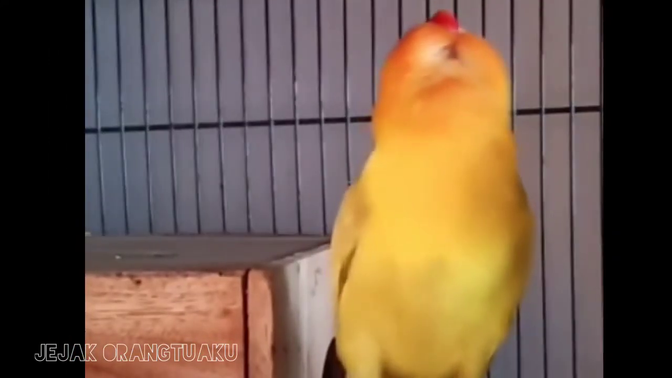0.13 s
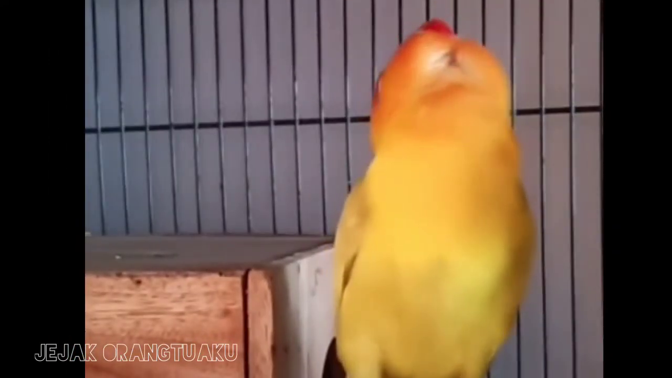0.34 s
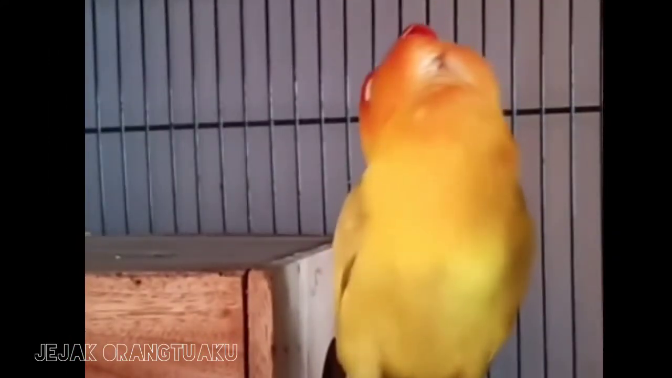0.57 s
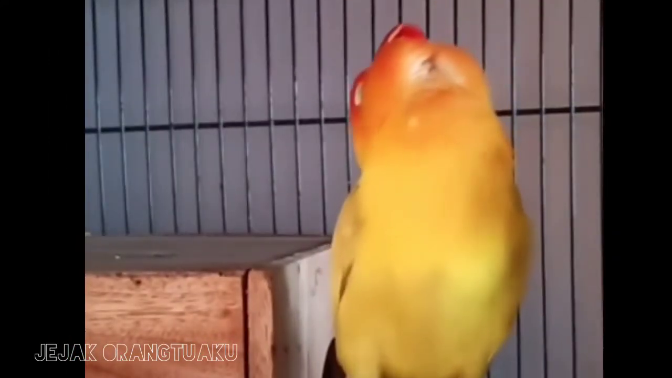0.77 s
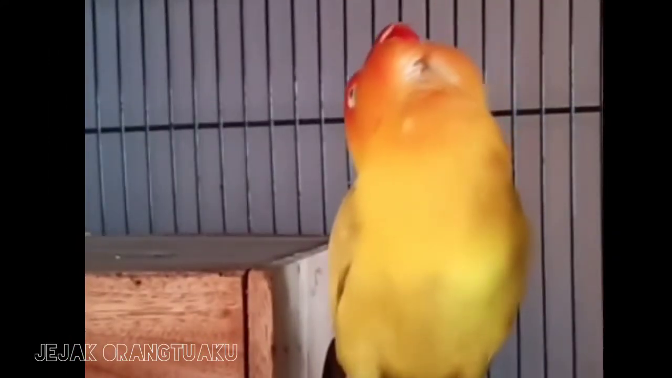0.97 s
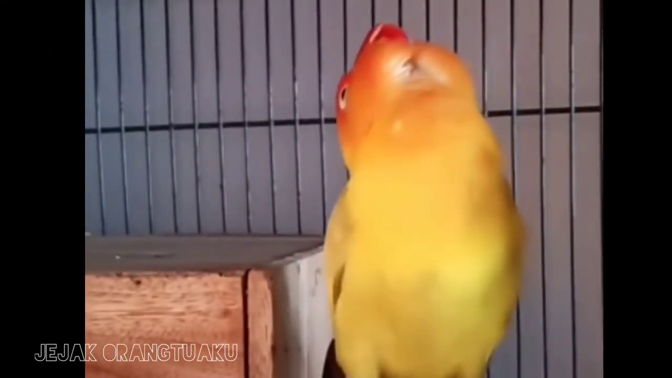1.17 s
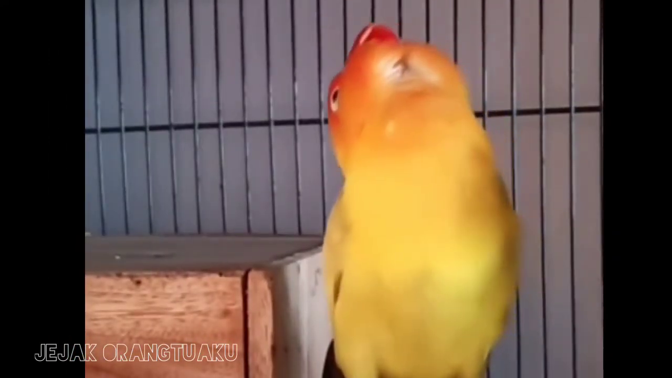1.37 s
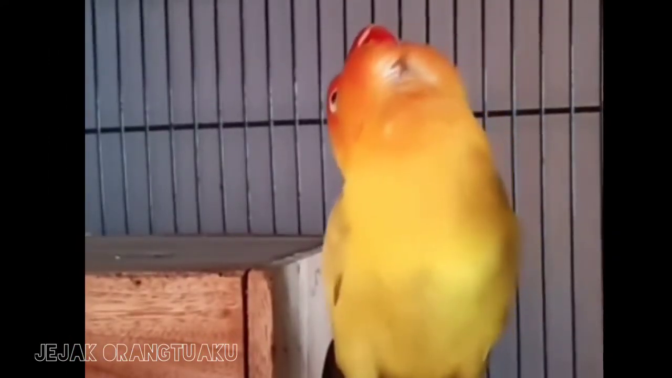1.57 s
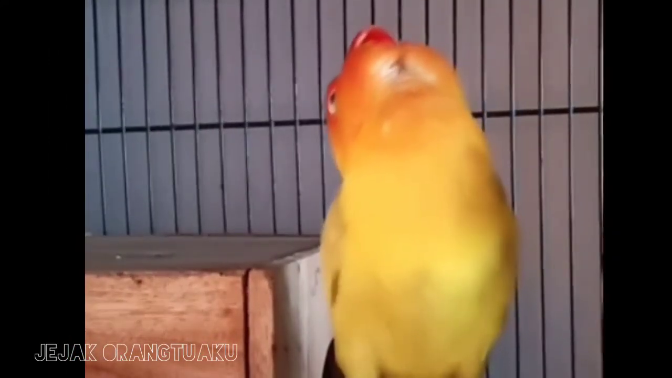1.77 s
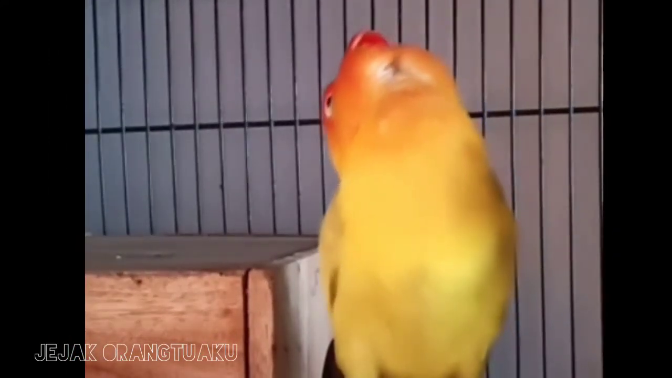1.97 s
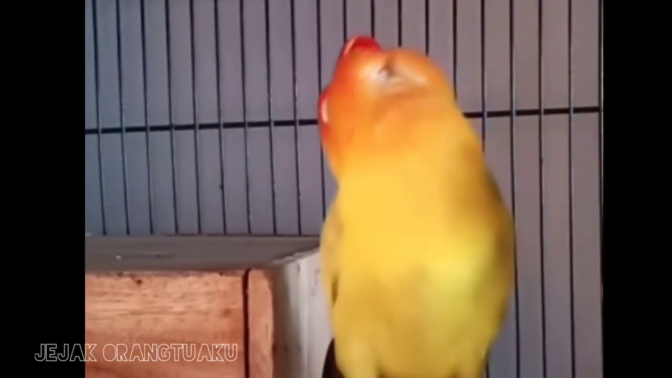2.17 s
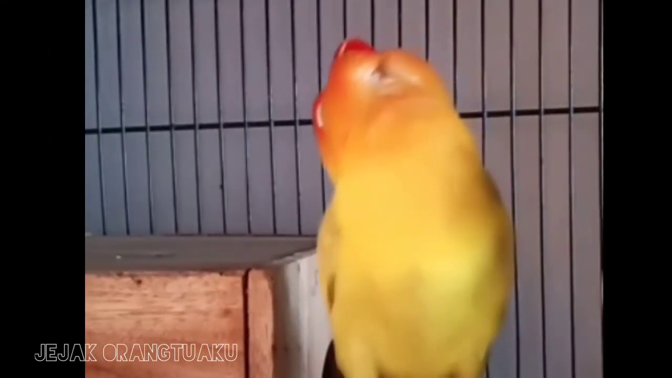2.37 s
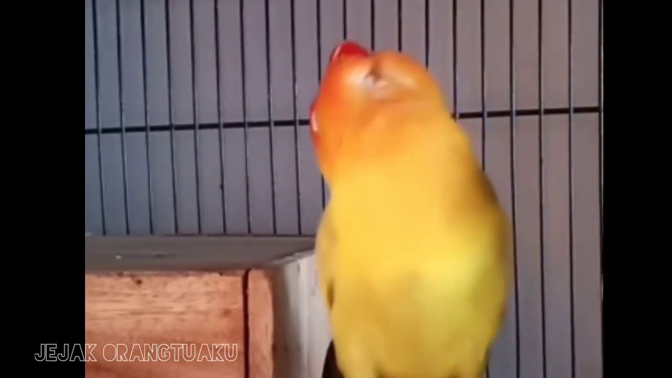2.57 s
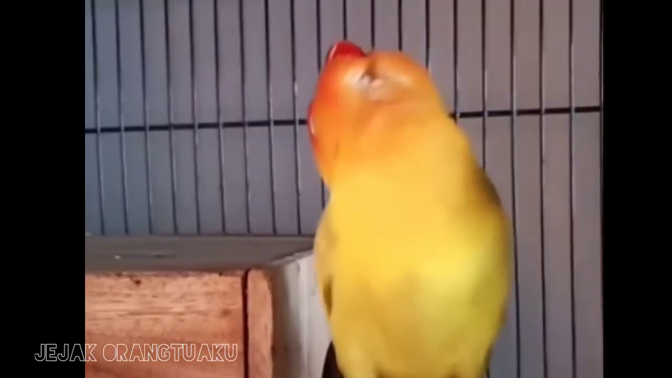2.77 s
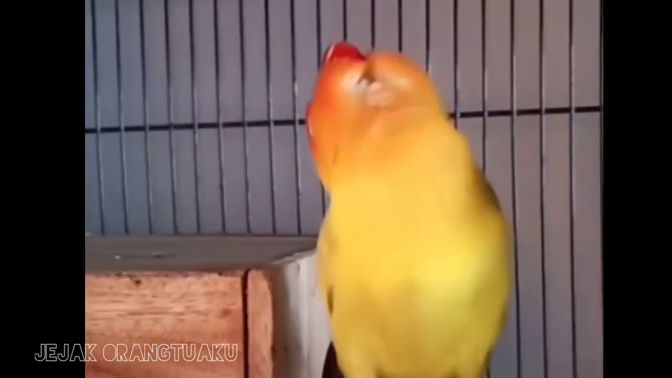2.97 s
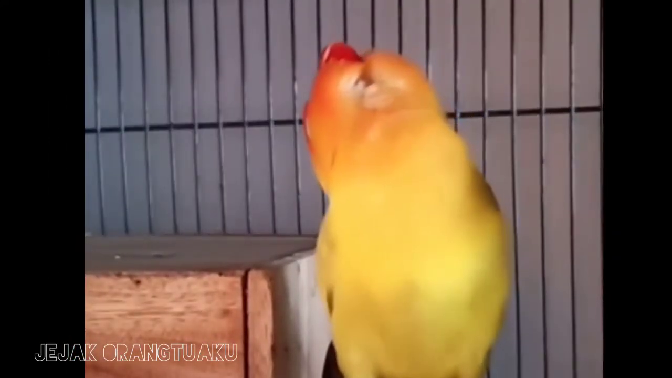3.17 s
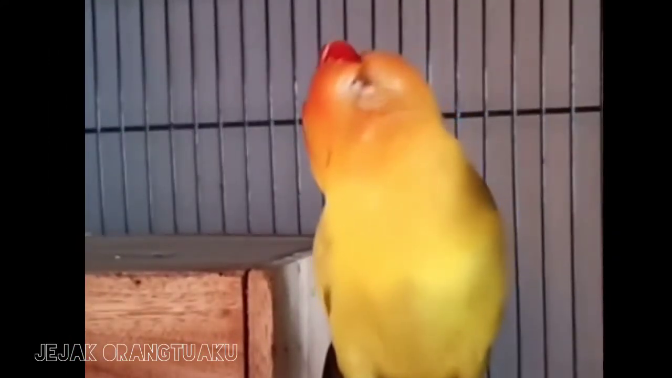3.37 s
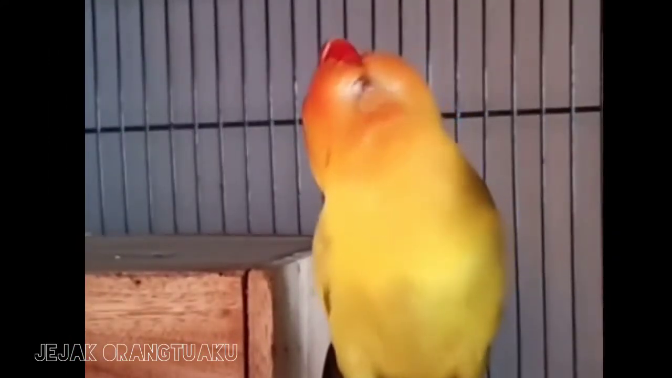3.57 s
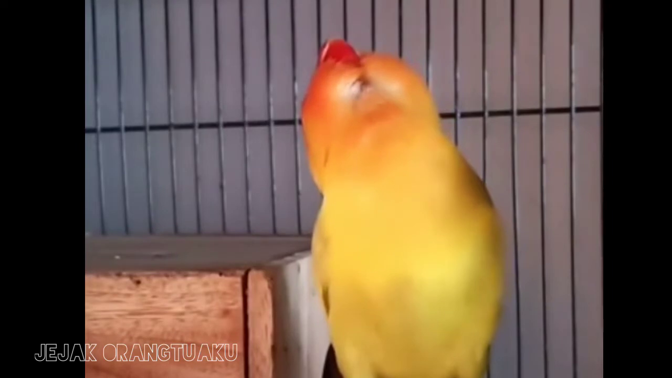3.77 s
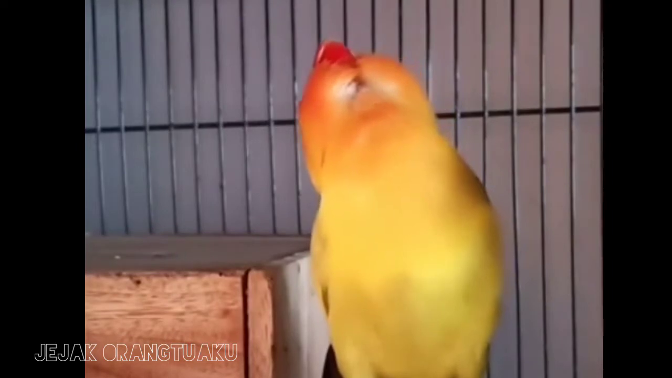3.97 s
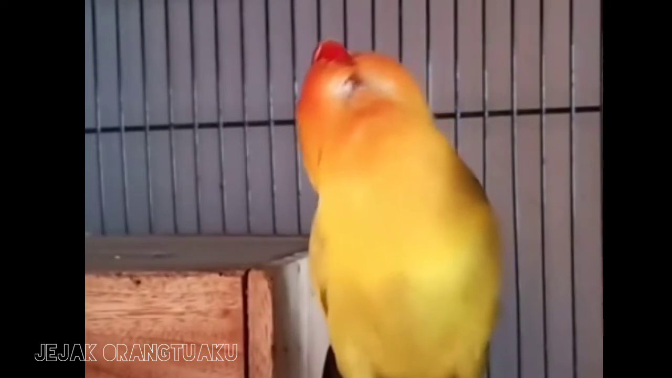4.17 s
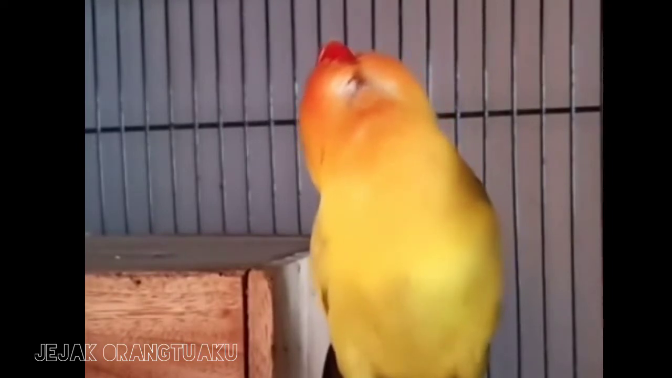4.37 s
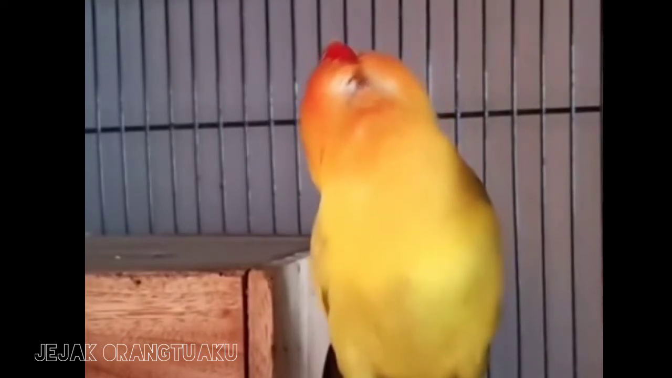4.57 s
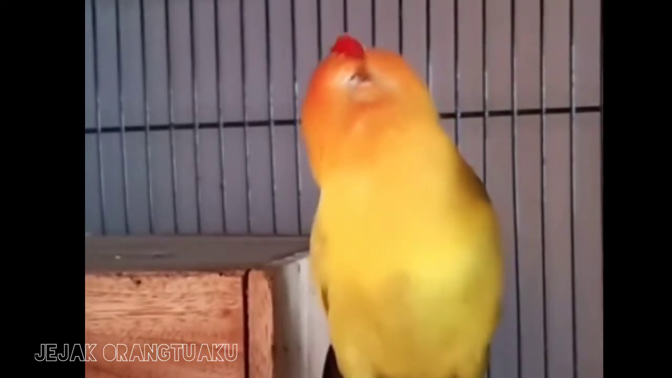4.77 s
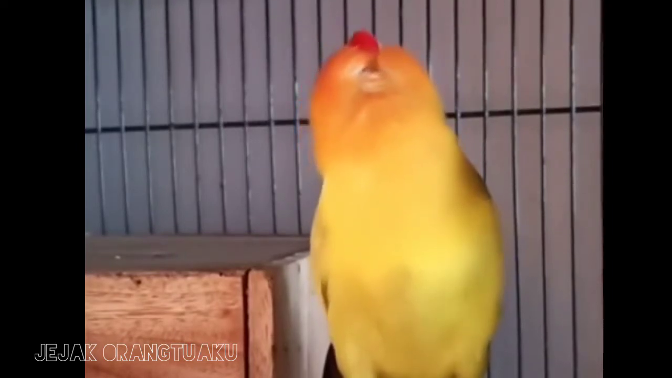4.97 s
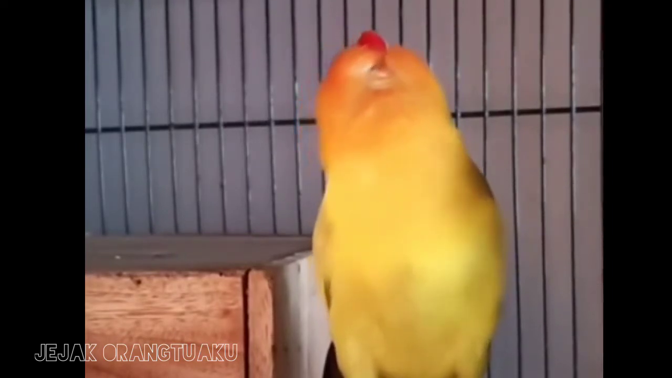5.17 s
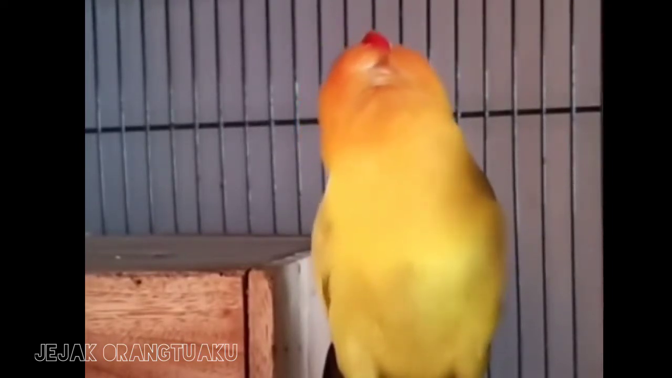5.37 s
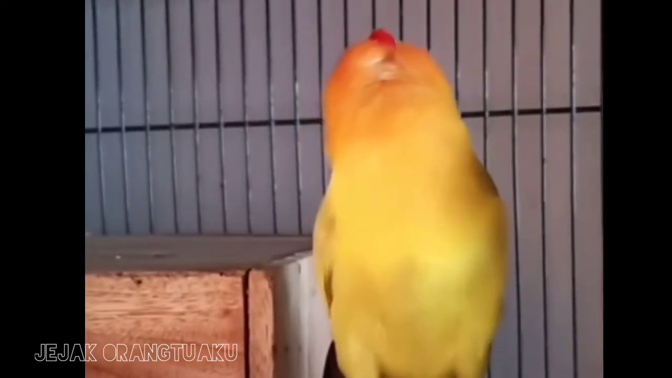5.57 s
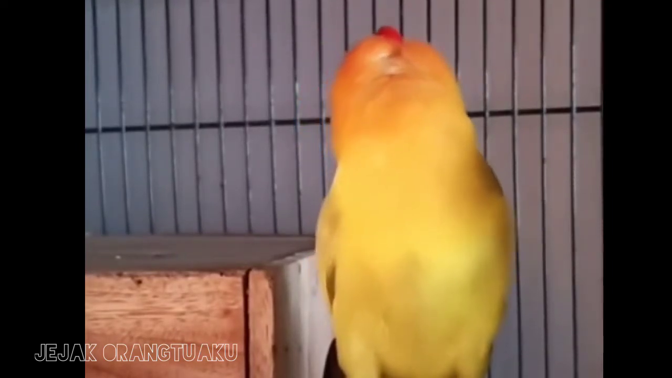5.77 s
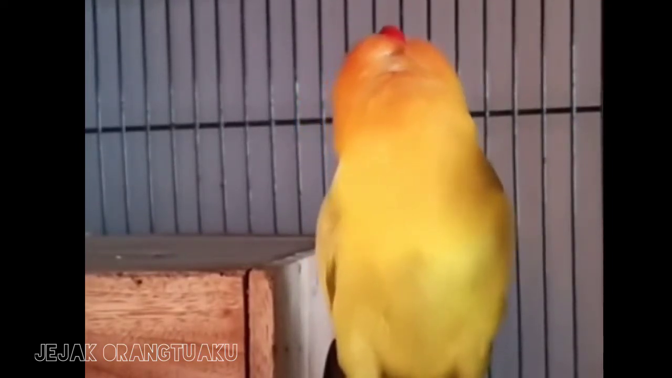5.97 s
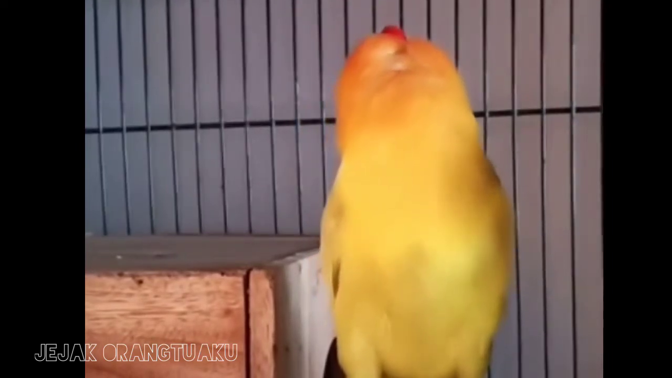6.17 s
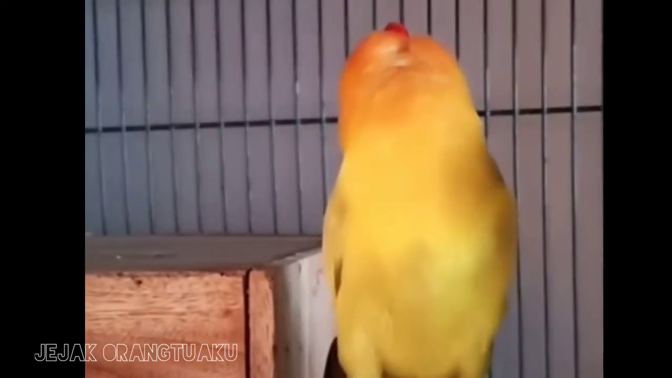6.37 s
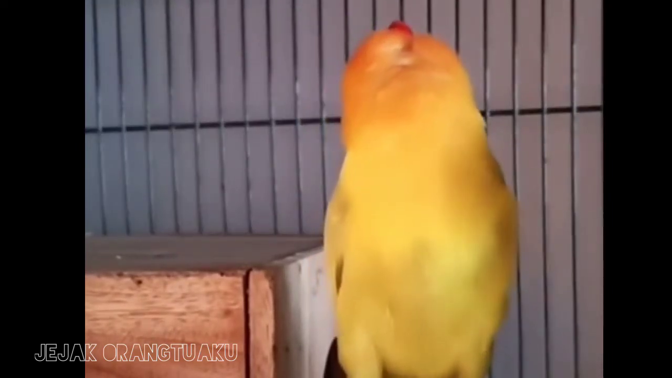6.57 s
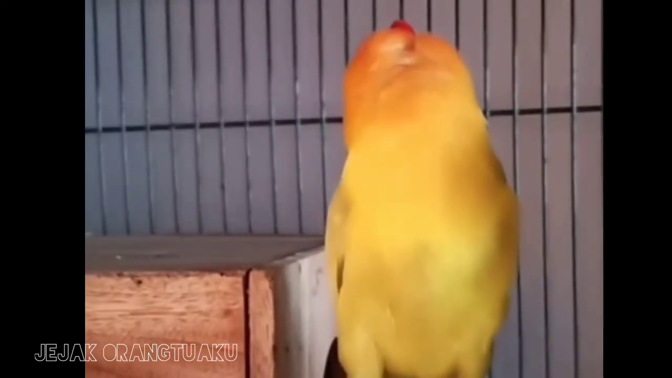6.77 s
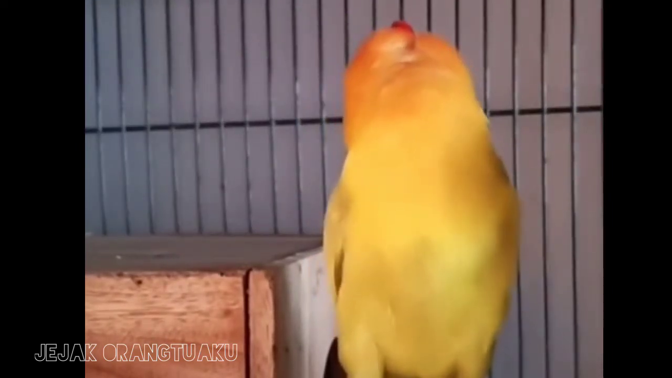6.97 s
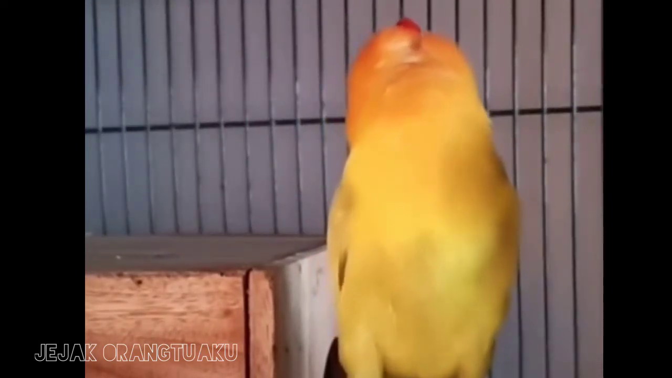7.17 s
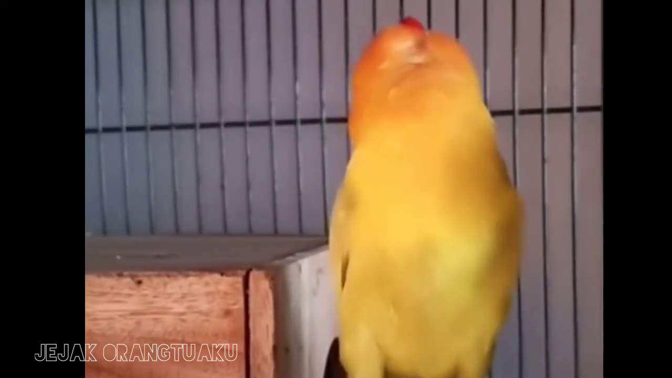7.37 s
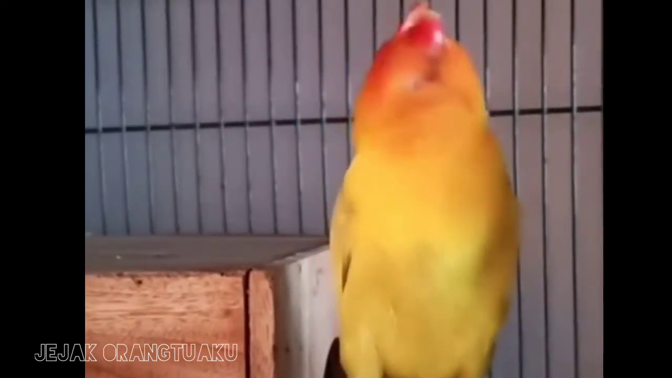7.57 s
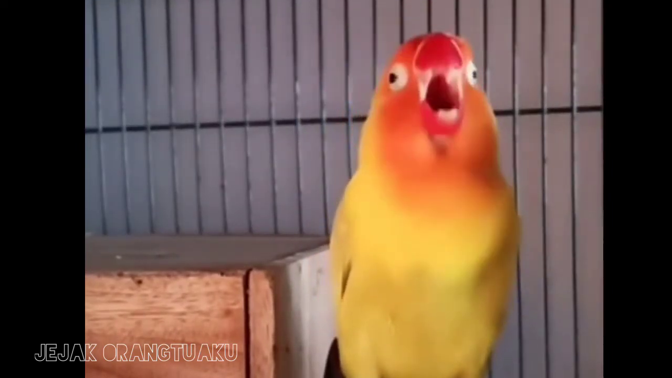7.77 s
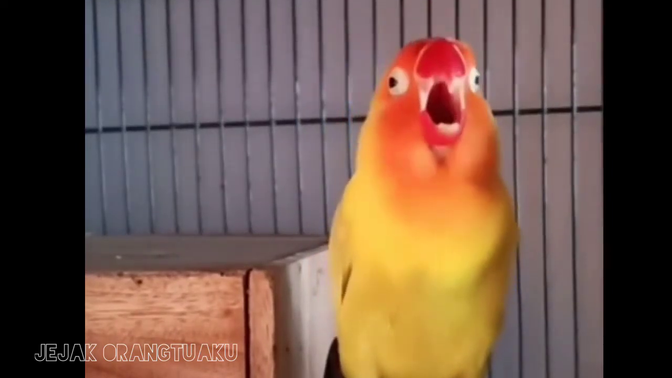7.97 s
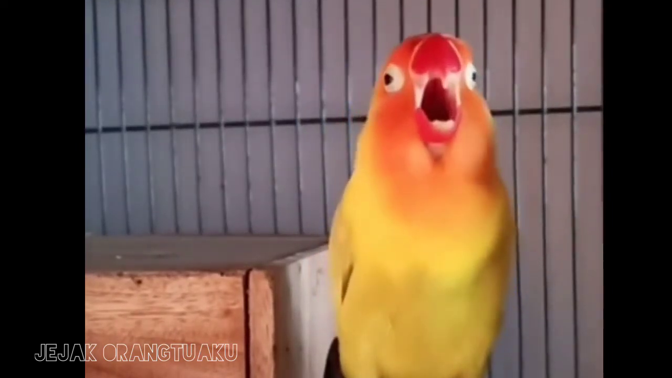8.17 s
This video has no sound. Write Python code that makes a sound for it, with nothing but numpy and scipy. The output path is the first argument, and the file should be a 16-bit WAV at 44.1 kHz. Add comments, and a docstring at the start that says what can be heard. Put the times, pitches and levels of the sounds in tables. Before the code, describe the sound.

A lovebird sings very close in a hard-walled room: sharp chirps, each a tiny puff and whistle breaking into a rasp. They race at eight or nine a second, then slow abruptly around three seconds to five, later three to four. Feathers flutter once at the change. A dull engine hum and traffic wash lie underneath, dipping with each chirp; other birds peep faintly near the end.

```python
"""In a hard-walled room, a caged lovebird chatters close by, slowing from nine to three syllables a second.
Each syllable opens with a noise puff, then a whistle of summed sines breaks into an unsteady rasp;
in the long ones the rasp settles into a rising tone. Feathers flutter once, as a swell of shaped noise.
Other birds call faintly in thin gliding notes. Outside, an engine hums (sines) over rumble and traffic (noise).
A gain control ducks everything under each syllable."""
import sys
import numpy as np
from scipy import signal
from scipy.fft import rfft, irfft, next_fast_len
from scipy.io import wavfile
from scipy.ndimage import uniform_filter1d

SR = 44100
rng = np.random.default_rng(int(sys.argv[2]) if len(sys.argv) > 2 else 0)


def generate_wav(sig):
    """Save sig (samples, or channels by samples) to the path in sys.argv[1] as 16-bit PCM at SR."""
    pcm = np.round(np.clip(np.atleast_2d(sig).T, -1, 1) * 32767).astype(np.int16)
    wavfile.write(sys.argv[1], SR, pcm)


N = 362943
TIME = np.arange(N) / SR


def from_db(db):
    """Turn decibels into a gain."""
    return 10 ** (np.asarray(db) / 20)


def rms_one(x):
    """Scale a sound to unit power."""
    return x / np.sqrt(np.mean(x ** 2) + 1e-20)


def in_time(rows):
    """Read each column of a time table at every sample."""
    s, *columns = np.transpose(rows)
    return [np.interp(TIME, s, c) for c in columns]


def at_hz(points, hz):
    """Read a frequency table, joining its points on a log-frequency axis."""
    f, value = np.transpose(points)
    return np.interp(np.log(hz + 1e-9), np.log(f), value)


def filtered(x, spectrum):
    """Pass a sound through a smooth table of gains."""
    n = x.shape[-1]
    size = next_fast_len(n)
    gain = from_db(at_hz(spectrum, np.fft.rfftfreq(size, 1 / SR)))
    return irfft(rfft(x, size) * gain, size)[..., :n]


def coloured(x, spectrum):
    """Give a sound a smooth spectrum and unit power."""
    return rms_one(filtered(x, spectrum))


def wobble(rate_hz, n):
    """Smooth random drift with a spread of one; a higher rate drifts faster."""
    r = np.exp(-2 * np.pi * rate_hz / SR)
    run_in = int(SR / rate_hz)
    slow = signal.lfilter([1], [1, -2 * r, r * r], rng.standard_normal(n + run_in))[run_in:]
    return slow * np.sqrt((1 - r * r) ** 3 / (1 + r * r))


def step(t, width):
    """Soft switch from 0 to 1 around t = 0."""
    return .5 + .5 * np.tanh(2 * t / width)


def add(track, s, sound):
    """Mix a sound in at a given time, trimming what falls outside the track."""
    at = int(s * SR)
    part = sound[max(-at, 0):max(N - at, 0)]
    track[max(at, 0):max(at, 0) + len(part)] += part


def hook(t, from_hz=550, to_hz=1850, rise_s=0.00341, hook_db=-18.0):
    """As the syrinx (the bird's voice organ) tightens, its fundamental flicks up from below the song's pitch."""
    hz = to_hz - (to_hz - from_hz) * np.exp(-t / rise_s)
    flick = np.sin(2 * np.pi * np.cumsum(hz) / SR)
    return from_db(hook_db) * flick * step(2 * rise_s - t, rise_s)


# a slow whistle is a clean line: its jitter, as a share of the pitch
WHISTLE_JITTER = 0.006
# partials of the whistle: (multiple of the pitch, relative level [dB])
WHISTLE = [(1, -10), (2, 9), (3, -16.5), (4, 10), (5, -6.5), (6, -11), (7, -4), (8, -10)]


def whistle(t, length, pitch_hz, hurry, rise=0.0075, scoop=0.075, scoop_s=0.00354, short_jitter=0.011,
            shimmer_db=4.0, second_db=-6.5, hurried_second_db=1.5, hurried_bright_db=3.0, speak_s=0.0032):
    """The syrinx swings regularly; slow whistles scoop up to their pitch, hurried ones are less steady."""
    hz = pitch_hz * (1 + rise * (2 * np.minimum(t / length, 1) - 1))
    scooping = scoop * (1 - hurry) * np.exp(-t / scoop_s)
    jitter = (WHISTLE_JITTER + hurry * short_jitter) * wobble(730, len(t))
    phase = 2 * np.pi * np.cumsum(hz * (1 - scooping + jitter)) / SR
    # hurry lifts every partial but the fourth, the second least
    extra_db = {2: second_db + hurry * hurried_second_db, 4: 0}
    tone = np.zeros(len(t))
    for k, (_, db) in enumerate(WHISTLE, 1):
        partial_db = db + extra_db.get(k, hurry * hurried_bright_db) + shimmer_db * wobble(65.7, len(t))
        tone += from_db(partial_db) * np.sin(k * phase)
    # a slow whistle takes a moment to speak after the puff
    return rms_one(tone) * step(t - speak_s * (1 - hurry), 0.0012)


# a slow rasp comes in pulses: (per s, depth dB, unevenness of the rate)
PULSE_PER_S, PULSE_DB, PULSE_UNEVEN = 95.7, 2, 0.25


def pulsing(n, depth_db):
    """The gain of a fast, nearly regular beating of the voice."""
    rate = PULSE_PER_S * (1 + PULSE_UNEVEN * wobble(63.5, n))
    turns = rng.random() + np.cumsum(rate) / SR
    return from_db(depth_db * np.cos(2 * np.pi * turns))


# pitch of the rasp as multiples of the whistle's: where a slow one starts and ends, and where a hurried one stays
RASP_FROM, RASP_TO, RASP_HURRIED = 1.05, 1.15, 1.35
# spread of the rasp's throbbing, and the air in slow rasps, which are mostly voiced (dB)
THROB_DB, SLOW_HISS_DB = 1.8, -8
# throat and beak during the rasp: (frequency [Hz], relative gain [dB])
THROAT = [(700, -26), (1500, -28), (2100, -16.5), (2500, -15), (3150, 7), (4100, -9.5), (4750, -3.5),
          (5300, -31), (6400, -7), (7100, -3.5), (7700, 10), (8400, -4), (9200, -12.5), (13900, -12),
          (15200, -19.5)]
# air rushing through the beak, here and under the whistle: (frequency [Hz], relative level [dB per Hz])
AIR = [(200, -21.5), (550, -14.5), (900, -18.5), (1450, -30), (2000, -7.5), (2450, 4), (3250, 1.5),
       (4100, -2), (5200, -2), (6400, -7.5), (7700, 6.5), (9200, -4.5), (13800, -10), (15300, -20)]
# slow rasps are thin around 3.3 kHz, between two strong bands: (frequency [Hz], relative gain [dB])
SLOW_RASP_COLOUR = [(2400, 2), (2800, -3), (3300, -18.5), (3700, 4), (4600, -3), (5300, 0), (6200, 0.5)]


def rasp(t, length, pitch_hz, hurry, leap_hz=2380, leap_s=0.011, chaos=0.0579, calm=0.022,
         unsettled=0.39, settle_s=0.045, throb_hz=130, hiss_db=-3.0):
    """The syrinx leaps up and swings chaotically; slow rasps drop back, calm and glide up; t is from the break."""
    n = len(t)
    slow = np.interp(t, [0.371 * length, 0.78 * length], [RASP_FROM, RASP_TO])
    glide = pitch_hz * (slow + hurry * (RASP_HURRIED - slow))
    hz = glide + (leap_hz - glide) * step(leap_s - t, 0.0013)
    # the higher register is the unstable one
    high = np.clip((hz - 2200) / 230, 0, 1)
    wild = np.maximum(high, unsettled * step(settle_s - t, 0.018))
    hz = hz * (1 + (calm + chaos * wild) * wobble(707, n))
    phase = 2 * np.pi * np.cumsum(hz) / SR
    # in the higher register the second partial weakens
    second = np.interp(hz, [2200, 2380], [1, .4])
    buzz = np.zeros(n)
    for k in range(1, 8):
        strength = second if k == 2 else k * hz < SR / 2  # leave out what is too high to represent
        buzz += strength * np.sin(k * phase)
    folds = coloured(buzz, THROAT)
    # steady pressure evens the loudness as partials cross the resonances
    folds = folds / (np.abs(uniform_filter1d(folds ** 2, size=130)) + .05) ** .25
    hiss_gain = from_db(hurry * hiss_db + (1 - hurry) * SLOW_HISS_DB)
    hiss = hiss_gain * wild * coloured(rng.standard_normal(n), AIR)
    throb = from_db(THROB_DB * wobble(throb_hz, n))
    voice = (folds + hiss) * throb * pulsing(n, (1 - hurry) * PULSE_DB)
    return rms_one(hurry * voice + (1 - hurry) * filtered(voice, SLOW_RASP_COLOUR))


# strengths within a syllable (dB): the whistle, then the opening puff and the air relative to it
WHISTLE_DB, PUFF_DB, AIR_DB = 14.5, -8, -22
# the faster the bird sings, the shorter each syllable and its whistle:
# unhurried length (s), and s lost per syllable a second
SYLLABLE_S, SYLLABLE_CUT_S = 0.11, 0.0072
WHISTLE_S, WHISTLE_CUT_S = 0.042, 0.0033
# around this tempo (syllables a second) the voice changes from its slow manner to its hurried one
HURRY_PER_S, HURRY_WIDTH_PER_S = 7.1, 0.416
RELEASE_S = 0.006  # every syllable is cut off quickly
# the puff with which the syrinx opens: (frequency [Hz], relative level [dB per Hz])
PUFF = [(150, -4), (450, -1), (900, -3), (1550, -7), (2500, 13), (4000, 3), (7000, 20.5), (10000, 15),
        (15000, -8)]
# syllables: (time [s], pitch [Hz], relative whistle level [dB], relative rasp level [dB])
SONG = [(-0.048, 1810, -30, -10), (0.064, 1792, -17.5, -24.5), (0.175, 1780, -19, -22.5),
        (0.2851, 1800, -17.5, -23.5), (0.3997, 1790, -20, -24.5), (0.5133, 1830, -21, -24),
        (0.6319, 1845, -13.5, -22), (0.7492, 1860, -16.5, -23), (0.871, 1823, -21, -24.5),
        (0.984, 1820, -21.5, -23), (1.1055, 1870, -15, -20), (1.2232, 1907, -18, -24.5),
        (1.3375, 1845, -14.5, -23), (1.4538, 1850, -19.5, -22.5), (1.572, 1873, -16, -22),
        (1.6863, 1840, -17, -23), (1.807, 1843, -17.5, -25.5), (1.92, 1762, -21, -24),
        (2.0312, 1840, -19, -24.5), (2.1496, 1860, -19, -22), (2.275, 1887, -16.5, -22.5),
        (2.406, 1838, -18, -23), (2.53, 1835, -20, -23.5), (2.6599, 1896, -15.5, -24),
        (2.7939, 1880, -18, -22), (2.9419, 1860, -18, -22.5), (3.1035, 1839, -11, -19),
        (3.2987, 1842, -14.5, -20.5), (3.5056, 1788, -15, -19.5), (3.696, 1861, -14.5, -22),
        (3.8871, 1844, -18.5, -22.5), (4.083, 1830, -15.5, -22.5), (4.278, 1828, -16, -21),
        (4.477, 1854, -13.5, -23), (4.6779, 1833, -15, -24), (4.898, 1851, -15, -22),
        (5.1248, 1862, -15.5, -23.5), (5.342, 1817, -17, -23), (5.5644, 1865, -15, -25),
        (5.79, 1858, -19, -23.5), (6.006, 1847, -20.5, -24), (6.2484, 1855, -17, -24.5),
        (6.4861, 1852, -23, -23), (6.7313, 1872, -19, -22), (6.9988, 1911, -16.5, -25.5),
        (7.337, 1882, -19.5, -22.5)]


def lovebird(fade_db=-6.5, rasp_db=15.0, puff_s=0.005):
    """Each syllable is a puff with an upward flick, a whistle with a little air, and a rasp; the tempo shapes them."""
    out = np.zeros(N)
    gaps = np.diff([row[0] for row in SONG])
    tempos = 1 / np.append(gaps, gaps[-1])
    t = TIME[:SR // 8]
    for (s, pitch_hz, clear_db, rough_db), tempo in zip(SONG, tempos):
        length = SYLLABLE_S - SYLLABLE_CUT_S * tempo
        split = WHISTLE_S - WHISTLE_CUT_S * tempo
        hurry = step(tempo - HURRY_PER_S, HURRY_WIDTH_PER_S)
        air = from_db(AIR_DB) * coloured(rng.standard_normal(len(t)), AIR)
        puff = from_db(PUFF_DB) * np.exp(-t / puff_s) * coloured(rng.standard_normal(len(t)), PUFF)
        tone = whistle(t, split, pitch_hz, hurry)
        clear = from_db(clear_db + WHISTLE_DB) * (tone + hook(t) + air + puff)
        # pressure runs out towards the end of the syllable
        fade = fade_db * (np.clip((t - split) / (length - split), 0, 1) - .5)
        rough = from_db(rough_db + rasp_db + fade) * rasp(t - split, length - split, pitch_hz, hurry)
        broken = step(t - split, 0.0027)
        voice = clear * np.sqrt(1 - broken) + rough * np.sqrt(broken)
        opening = (1 - np.exp(-t / .001)) ** 2
        add(out, s, voice * opening * step(length - t, RELEASE_S))
    return out


def both_sides(own):
    """Noise shared by left and right, plus some of each side's own."""
    return rng.standard_normal(N) + own * rng.standard_normal((2, N))


DRONE_HZ, DRONE_DB = 303, -64  # a faint steady drone indoors
# engine outside: (time [s], firing rate [per s], relative hum level [dB], relative rumble level [dB])
ENGINE = [(0.0, 133.0, -38, -39.5), (0.55, 113, -19, -40.0), (1.1, 115, -26, -38.0), (1.8, 130, -31, -36),
          (2.3, 111.0, -43, -42.5), (2.7, 113, -27.5, -40), (3.2, 134, -45, -50), (3.8, 99, -51, -60),
          (4.35, 125, -39, -40.5), (5.25, 116, -30, -48), (5.9, 134.0, -34.5, -44), (6.15, 140, -40, -51.5),
          (6.6, 130, -32, -46), (7.25, 107, -49, -56.5), (7.75, 134, -36, -61.5), (8.23, 127.0, -42, -58.5)]
# colour of the engine's rumble: (frequency [Hz], relative level [dB per Hz])
RUMBLE = [(25, -40), (50, -14), (70, -2.5), (110, 10), (150, 4), (200, -13.5), (380, -10), (550, -30),
          (1200, -53), (3000, -36)]
# wash of traffic: (time [s], relative level [dB])
STREET = [(0.0, -52.5), (0.64, -52), (1.83, -44.5), (3.48, -61.5), (3.83, -65.5), (6.55, -83), (8.23, -70)]
# colour of the wash: (frequency [Hz], relative level [dB per Hz])
STREET_COLOUR = [(200, -9), (450, -3), (1000, -3.5), (1600, -4), (3000, 0), (7500, -6.5), (10000, -6),
                 (15000, -60)]
# the deepest rumble of the street, dying away: (time [s], level [dB])
DEEP = [(0, -40), (3.4, -47), (6.4, -51), (8.23, -63)]
# colour of the deepest rumble: (frequency [Hz], relative level [dB per Hz])
DEEP_COLOUR = [(25, -16), (45, -10), (65, 5), (90, -4), (140, -21), (300, -60)]


def street(second_db=-24.5, third_db=-27, waver=0.0199, throb_db=3.5, firing_db=-6.5,
           rumbling_db=7.5, lumpy_db=3.5, wash_db=14.5):
    """An engine's firing tone and lumpy rumble sound dully over a wash of traffic, with a steady drone."""
    firing_hz, hum_db, rumble_db = in_time(ENGINE)
    phase = 2 * np.pi * np.cumsum(firing_hz * (1 + waver * wobble(14.35, N))) / SR
    overtones = from_db(second_db) * np.sin(2 * phase) + from_db(third_db) * np.sin(3 * phase)
    hum = rms_one(np.sin(phase) + overtones)
    hum_gain = from_db(hum_db + firing_db + throb_db * wobble(6.2, N))
    rumble = coloured(both_sides(0.093), RUMBLE)
    rumble_gain = from_db(rumble_db + rumbling_db + lumpy_db * wobble(9.14, N))
    engine = hum_gain * hum + rumble_gain * rumble
    wash = from_db(in_time(STREET)[0] + wash_db) * coloured(both_sides(1.27), STREET_COLOUR)
    deep = from_db(in_time(DEEP)[0]) * coloured(both_sides(0.11), DEEP_COLOUR)
    drone_tone = np.sin(2 * np.pi * DRONE_HZ * TIME + 0.21 * wobble(6.2, N))
    return engine + wash + deep + from_db(DRONE_DB) * rms_one(drone_tone)


# a flurry of feathers: (time [s], level before random unevenness [dB])
FLUTTER = [(3.10, -110), (3.17, -48), (3.21, -23), (3.26, -22.5), (3.30, -18), (3.36, -14.5), (3.50, -110)]
# colour of the feathers: (frequency [Hz], relative level [dB per Hz])
FEATHERS = [(300, -74), (1200, -6.5), (2000, -11), (3000, 2.5), (4500, -5.5), (7000, -12), (10000, -14.5),
            (15000, -15)]


def flutter(uneven_db=3.5):
    """Feathers brush and beat for a moment: noise with an uneven level."""
    level_db = in_time(FLUTTER)[0] + uneven_db * wobble(36, N)
    return from_db(level_db) * coloured(rng.standard_normal(N), FEATHERS)


def thin_note(length, start_hz, end_hz, jitter_hz, octave_db=-19):
    """A thin gliding note with a faint octave."""
    n = int(length * SR)
    hz = np.linspace(start_hz, end_hz, n) + jitter_hz * wobble(200, n)
    phase = 2 * np.pi * np.cumsum(hz) / SR
    tone = np.sin(phase) + from_db(octave_db) * np.sin(2 * phase)
    return rms_one(tone) * signal.windows.tukey(n, .5)


SAG_HZ_PER_S = 1180
FIRST_CALL_S, CALL_EVERY_S = 7.643, 0.25
# sagging whistles of a bird in another cage: (time [s], length [s], start pitch [Hz], relative level [dB])
NEIGHBOURS = [(3.802, 0.03, 3280, -28), (5.202, 0.14, 2950, -45), (5.932, 0.061, 2920, -39),
              (6.345, 0.14, 2960, -40), (7.547, 0.11, 3174, -34.5), (7.739, 0.073, 3000, -37.5),
              (7.959, 0.086, 2547, -41)]
# a third bird's call, two notes repeated at an even pace:
# (delay [s], length [s], start pitch [Hz], end pitch [Hz], relative level [dB])
CALL = [(0, 0.05, 3920, 5040, -40.5), (0.062, 0.185, 5966, 6180, -43.5)]


def neighbours():
    """Birds in other cages: one gives hoarse sagging whistles, one repeats an upslur and a high note."""
    out = np.zeros(N)
    for s, length, hz, db in NEIGHBOURS:
        note = thin_note(length, hz, hz - SAG_HZ_PER_S * length, jitter_hz=60.7)
        add(out, s, from_db(db) * note)
    for s in np.arange(FIRST_CALL_S, N / SR, CALL_EVERY_S):
        for delay, length, start_hz, end_hz, db in CALL:
            note = thin_note(length, start_hz, end_hz, jitter_hz=49.6)
            add(out, s + delay, from_db(db) * note)
    return out


# how far the left leads the right: (frequency [Hz], phase [radians])
SIDE_PHASE = [(100, 0), (1200, -3), (1850, -2.5), (2250, -6.5), (3750, -10.5), (6300, -21.5), (7300, -21),
              (7800, -22.5), (8600, -26), (15000, -56)]
# how the two sides differ in level: (frequency [Hz], left minus right [dB])
SIDE_BALANCE = [(2200, 0), (3050, -14.5), (3750, 6), (4500, 4.5), (6000, 6), (7200, 4.5), (8000, -12),
                (9800, -1.5), (13500, 2), (15200, 37)]


def widened(x):
    """Left and right differ in phase and level by frequency, which widens the sound."""
    size = next_fast_len(N + SR // 10)
    hz = np.fft.rfftfreq(size, 1 / SR)
    side = np.array([[.5], [-.5]])
    gain = from_db(side * at_hz(SIDE_BALANCE, hz))
    gain = gain / np.sqrt(np.mean(gain ** 2, axis=0))  # keep the power of the pair
    turn = np.exp(1j * side * at_hz(SIDE_PHASE, hz))
    return irfft(rfft(x, size) * gain * turn, size)[:, :N]


# time for the room's ring to fall by 60 dB (s), below and in the treble
ROOM_T60_S, TREBLE_T60_S = 0.51, 0.21
# colour of the room's ring: (frequency [Hz], relative level [dB])
ROOM = [(800, -37), (1500, -1), (2100, 15.5), (2700, 8), (3250, 2.5), (3700, 4), (4200, 11.5), (5250, 8),
        (6400, 8.5), (7700, 6), (10000, 12), (15000, 18.5)]


def room(x, build_s=0.00057, treble_hz=9500):
    """Dense reflections build up and die away, the treble fastest, different on each side."""
    t = TIME[:SR]
    noise = coloured(rng.standard_normal((2, SR)), ROOM)
    low_pass = signal.butter(4, treble_hz, fs=SR, output="sos")
    low = signal.sosfiltfilt(low_pass, noise)
    treble = noise - low
    ring = low * from_db(-60 * t / ROOM_T60_S) + treble * from_db(-60 * t / TREBLE_T60_S)
    tail = ring * (1 - np.exp(-t / build_s))
    return signal.fftconvolve(x[None], rms_one(tail) / np.sqrt(SR), axes=1)[:, :N]


# the direct sound sways between the sides: (time [s], left minus right [dB])
SWAY = [(0, -1.5), (1.2, -0.5), (2.5, 1), (3.2, 1), (4.2, 1), (5.6, 0.5), (6.3, 1.4), (7.3, -0.5)]


def scene(near_room_db=-8, far_direct_db=-4.5, far_room_db=0.0):
    """The singer is near; the other birds are heard mostly through the room."""
    near, far = lovebird() + flutter(), neighbours()
    sway = from_db(np.array([[.5], [-.5]]) * in_time(SWAY)[0])
    direct = widened(near + from_db(far_direct_db) * far) * sway
    reflected = room(from_db(near_room_db) * near + from_db(far_room_db) * far)
    return direct + reflected + street()


def gain_control(x, threshold_db=-15.0, recovery_db_per_s=200, ahead_s=0.012, attack_s=0.002, squeeze=.6):
    """The gain is turned down just ahead of each loud sound and recovers in the gaps."""
    power = uniform_filter1d(np.mean(x ** 2, axis=0), size=260)
    level = 10 * np.log10(np.abs(power) + 1e-12)
    level = np.maximum(level, np.interp(TIME + ahead_s, TIME, level))
    # the sensed level jumps up at once but falls only at the recovery rate
    recovery = recovery_db_per_s * TIME
    held = np.maximum.accumulate(level + recovery) - recovery
    r = np.exp(-1 / (attack_s * SR))
    excess = signal.lfilter([1 - r], [1, -r], np.maximum(held - threshold_db, 0))
    return x * from_db(-squeeze * excess)


CUTOFF_HZ = 15500
# the microphone's uneven top: (frequency [Hz], gain [dB])
MICROPHONE = [(9000, 1.5), (12700, -0.5), (13700, -8.5), (14500, -1), (15200, 5)]


def record(dry):
    """Microphone colour, gain control, clipping at full scale, and a steep cut of the top."""
    low_pass = signal.ellip(10, .3, 80, CUTOFF_HZ, fs=SR, output="sos")
    controlled = gain_control(filtered(dry, MICROPHONE))
    return signal.sosfilt(low_pass, np.clip(controlled, -1, 1))


dry = scene()
out = record(dry)
generate_wav(out)
```